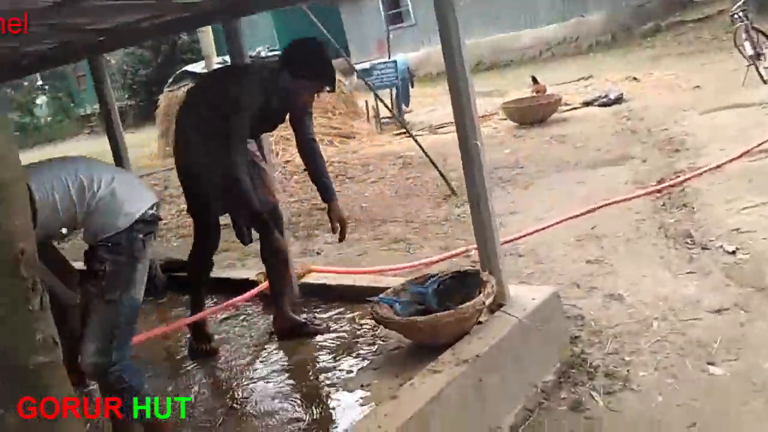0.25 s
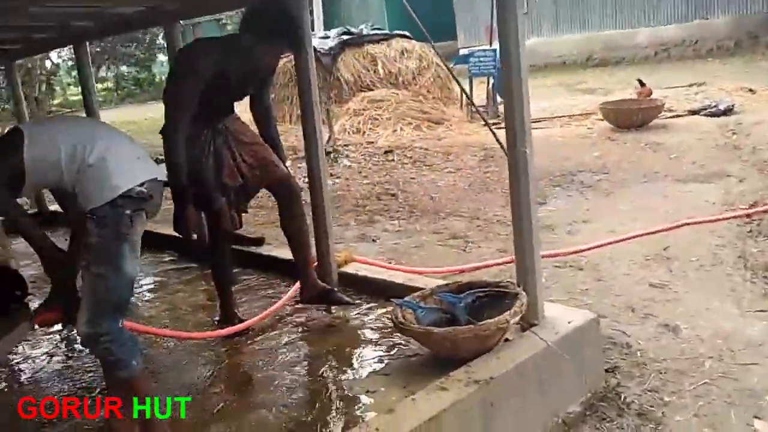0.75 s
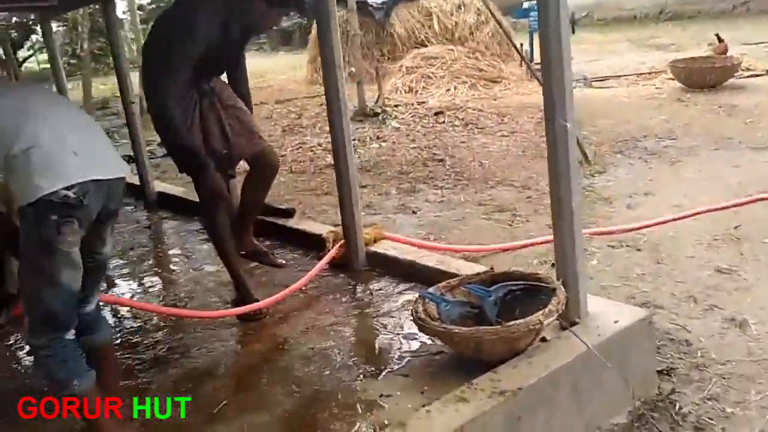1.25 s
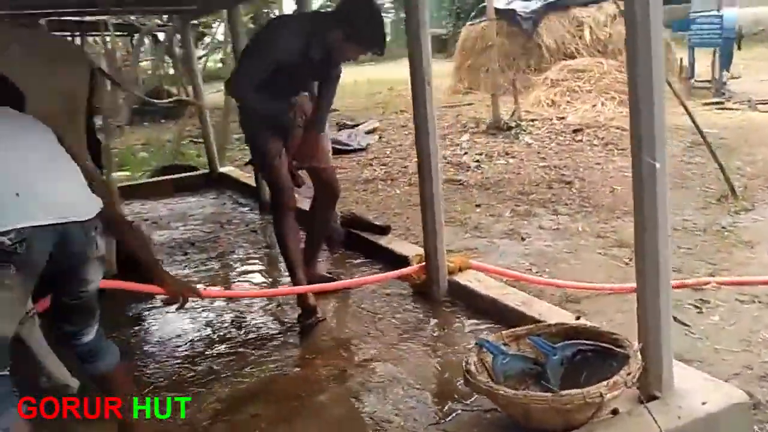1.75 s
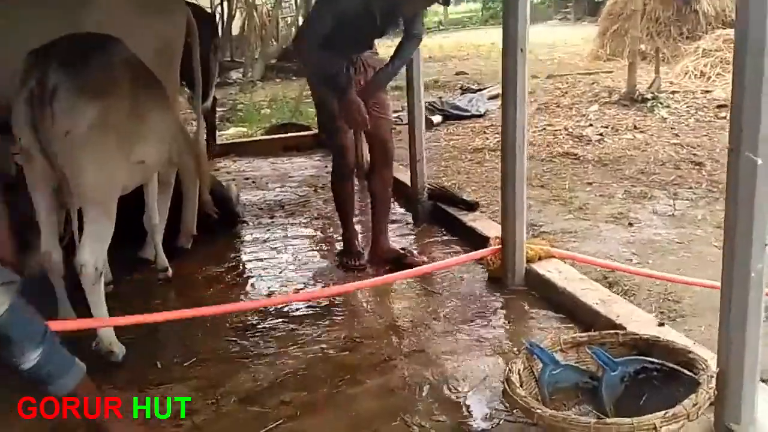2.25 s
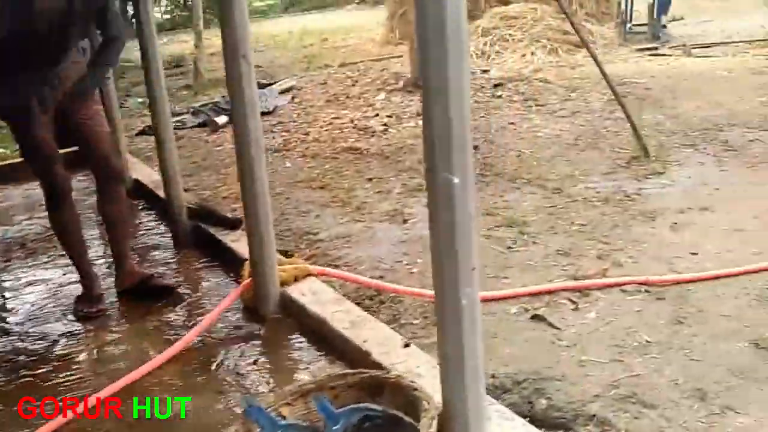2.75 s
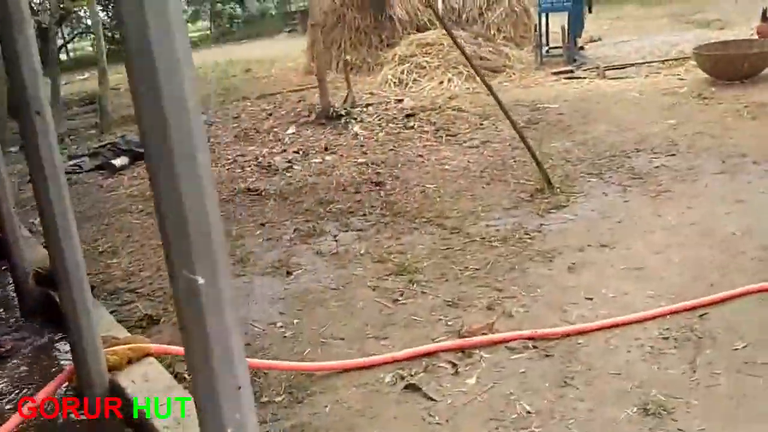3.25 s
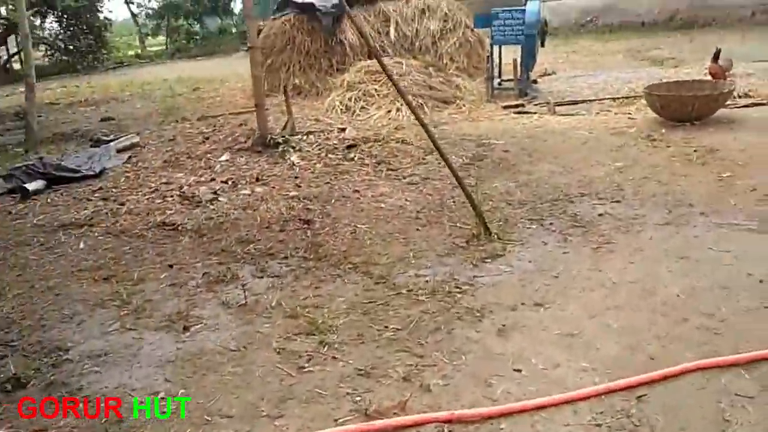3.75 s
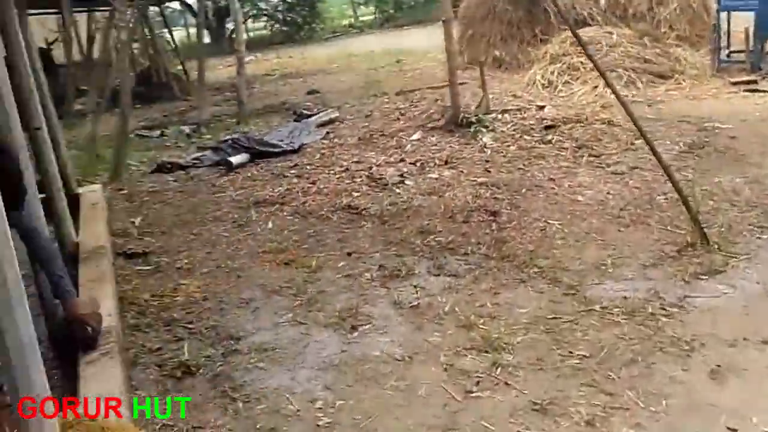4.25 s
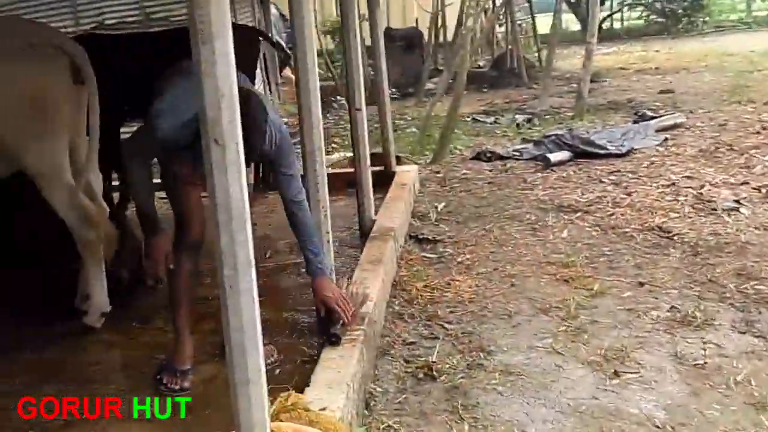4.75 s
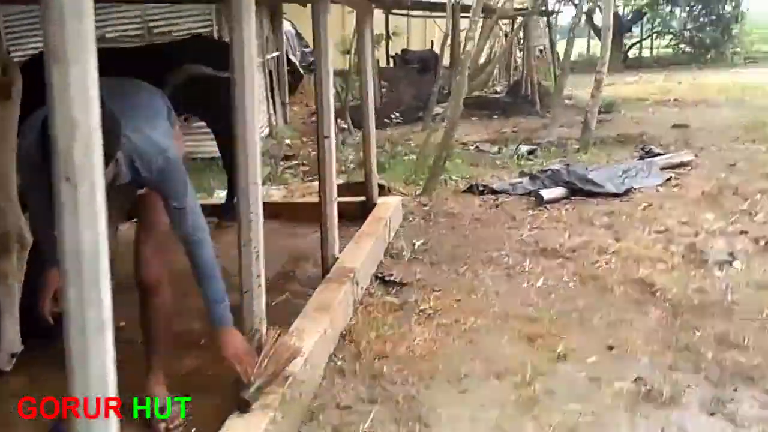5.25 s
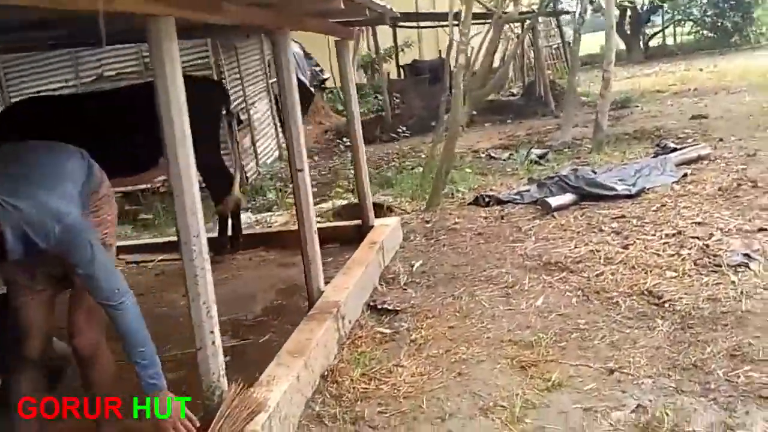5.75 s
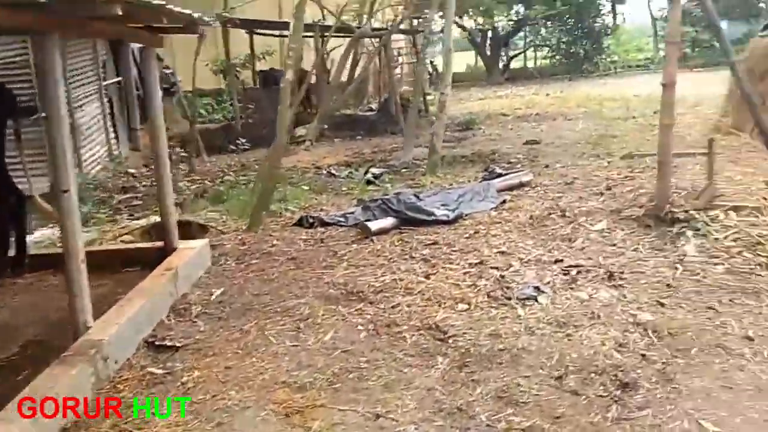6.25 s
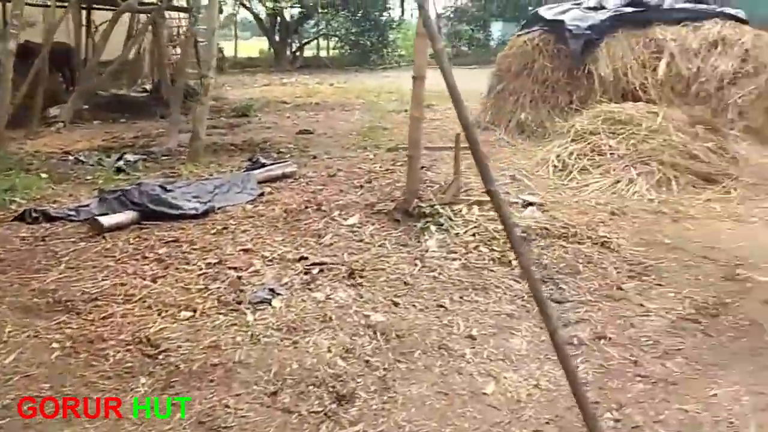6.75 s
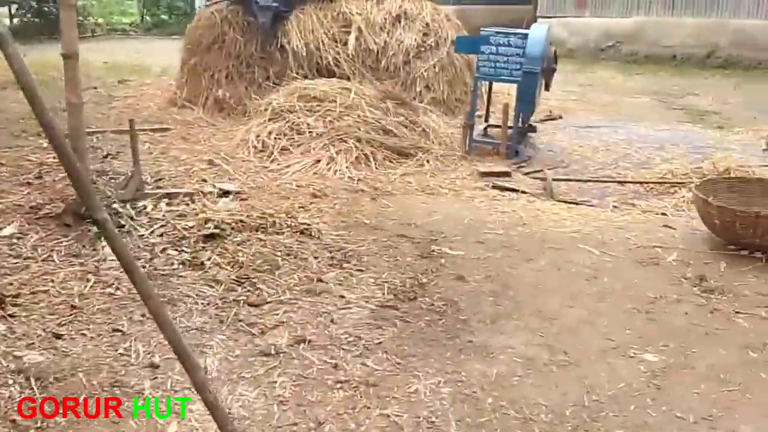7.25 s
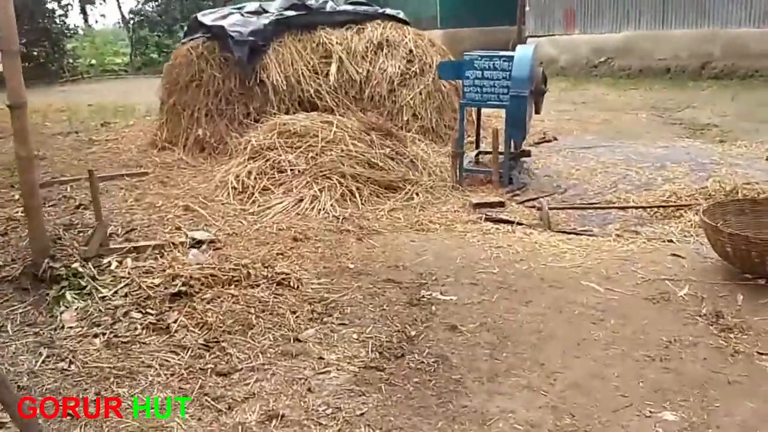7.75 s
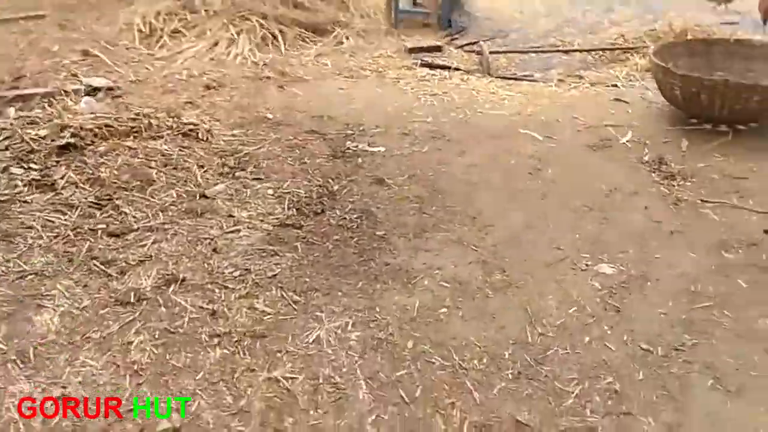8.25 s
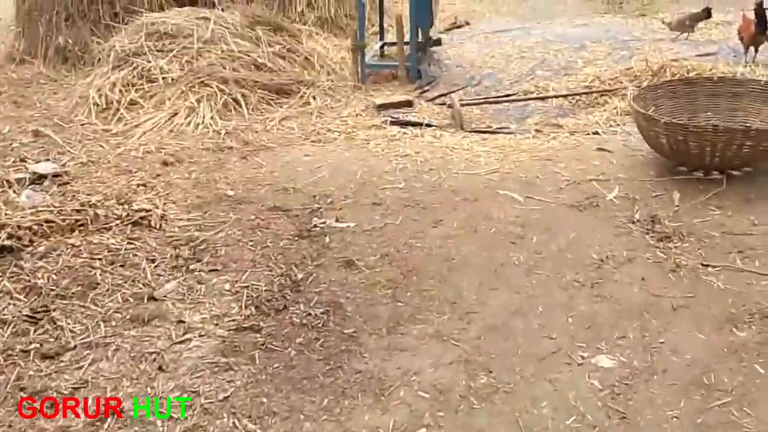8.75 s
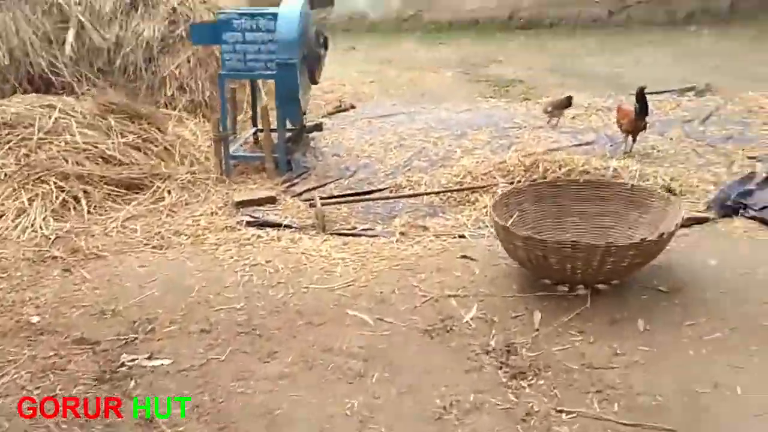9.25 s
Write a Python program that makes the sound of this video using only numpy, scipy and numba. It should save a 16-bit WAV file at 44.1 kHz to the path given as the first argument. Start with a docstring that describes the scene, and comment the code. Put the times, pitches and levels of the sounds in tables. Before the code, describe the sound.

Hose water runs and spatters over wet concrete in an open shed, with sharp slaps, plops, scratchy brush scrubbing and wind thumps.

```python
"""An open cattle shed: hose water runs, spatters and slaps on the wet concrete floor near a hand-held phone.
Crowds of short damped sines over filtered noise make the running water and the slaps; groups of damped sines
that rise in pitch make plops, short thuds and sharp ringing drips. Decaying noise tails give the short echo of
the tin roof. A brush scrubs the kerb as flicks over a rasp, a faint motor hums as a wavering sine, and wind
buffets mostly the left microphone as coloured noise with low thumps."""
import sys
import numpy as np
from scipy import signal
from scipy.fft import rfft, irfft, next_fast_len
from scipy.io import wavfile
from scipy.ndimage import uniform_filter1d, map_coordinates
from numba import njit

SR = 44100
rng = np.random.default_rng(int(sys.argv[2]) if len(sys.argv) > 2 else 0)


def gain_from_decibels(decibels):
    """Convert decibel values to linear amplitude factors."""
    exponent = np.asarray(decibels, float) / 20
    return 10 ** exponent


def generate_wav(sig):
    """Save sig (samples, or channels by samples) to the path in sys.argv[1] as 16-bit PCM at SR."""
    pcm = np.round(np.clip(np.atleast_2d(sig).T, -1, 1) * 32767).astype(np.int16)
    wavfile.write(sys.argv[1], SR, pcm)


N = 418509
TIME = np.arange(N) / SR


def curve(table, column=1):
    """One column of a table as a value per sample."""
    rows = np.array(table)
    return np.interp(TIME, rows[:, 0], rows[:, column])


def unit(x):
    """Scale to rms 1."""
    return x / np.sqrt(np.mean(x ** 2))


def peak_one(x):
    """Scale to peak 1."""
    return x / np.max(np.abs(x))


def shape(points, hz):
    """Gain of (Hz, dB) points joined on a log axis."""
    rows = np.array(points)
    return gain_from_decibels(np.interp(np.log(hz + 1), np.log(rows[:, 0]), rows[:, 1]))


def colour(x, points):
    """Filter by (Hz, dB) points."""
    length = x.shape[-1]
    size = next_fast_len(length)
    gain = shape(points, np.fft.rfftfreq(size, 1 / SR))
    return irfft(rfft(x, size) * gain, size)[..., :length]


def band(x, lo_hz, hi_hz):
    """Band-pass with firm skirts."""
    return signal.sosfilt(signal.butter(3, [lo_hz, hi_hz], "band", fs=SR, output="sos"), x)


def walk(rate):
    """Random levels held 1 / rate s and slewed twice; spread 1."""
    hold = int(SR / rate)
    steps = np.repeat(rng.standard_normal(N // hold + 1), hold)
    slewed = uniform_filter1d(uniform_filter1d(steps, hold), hold)
    return unit(slewed[:N])


def swell(t, length, rise, fall):
    """Gain that rises from t = 0, holds, and dies away after length seconds."""
    return (1 - np.exp(-t.clip(0) / rise)) * np.exp(-(t - length).clip(0) / fall)


@njit
def ring(length, start, hz, cycles, glide, size, lag):
    """Damped sines that swell in over a cycle and rise in pitch; the second port hears each at its own lag."""
    out = np.zeros((2, length + 64))  # 32 spare samples at each end for the lags
    for k in range(len(start)):
        span = int(cycles[k] * SR / hz[k]) + 1  # time constant in samples
        step, rise, fade = 2 * np.pi * hz[k] / SR, glide[k] / span, np.exp(-1 / span)
        phase, a = 0., size[k]
        for i in range(min(4 * span, length - start[k])):
            phase += step * (1 + rise * i)
            a *= fade
            v = a * np.sin(phase) * min(phase / (2 * np.pi), 1.)
            out[0, start[k] + i + 32] += v
            out[1, start[k] + i + 32 + lag[k]] += v
    return out[:, 32:length + 32]


def drops(length, s, hz, chance, spread, cycles, scatter_db, width_ms):
    """Drops at times s, pitches spread about hz, landing over a patch of floor; most are small, a few large."""
    start = (s * SR).astype(np.int64)
    pitch = np.clip(hz * np.exp(spread * chance[:, 0]), 200, 9000)
    size = gain_from_decibels(scatter_db * np.minimum(chance[:, 1] ** 2, 5.5)) * np.sign(chance[:, 2])
    turns = cycles * np.exp(.5 * chance[:, 2])
    lag = np.clip(width_ms * chance[:, 3] * SR / 1000, -30, 30).astype(np.int64)
    return ring(length, start, pitch, turns, np.full(len(s), .03), size, lag)


ROOF_T60_S = .17


def roof(x, size=16384):
    """Tin roof and floor scatter the sound differently to each port; the pattern changes as the phone turns."""
    out, t = np.zeros((2, N + SR)), np.arange(int(.25 * SR)) / SR
    padded, fade = np.pad(x, (size, 2 * size)), np.hanning(2 * size)
    for at in range(0, N + size, size):
        # a fresh tail for each overlapping, faded piece; nothing returns in the first 3 ms
        tail = rng.standard_normal((2, len(t))) * gain_from_decibels(-60 * t / ROOF_T60_S) * (t > .003)
        tail = tail / np.sqrt(np.sum(tail ** 2, axis=1, keepdims=True))
        piece = padded[at:at + 2 * size] * fade
        wet = signal.fftconvolve(piece[None], tail, axes=1)[:, max(size - at, 0):]
        begin = max(at - size, 0)
        out[:, begin:begin + wet.shape[1]] += wet[:, :N + SR - begin]
    return out[:, :N]


# Gusts that thump the left port. Each row: time in seconds, 7 ms ahead of the thump, level in dB, pitch in Hz.
GUST_THUMPS = [(2.443, -40.5, 72.4), (2.554, -33.5, 92), (3.278, -39.5, 58.3), (4.086, -42.5, 87),
               (4.486, -33.5, 99.5), (4.506, -36, 128), (6.291, -43.5, 83), (6.953, -36, 95.4),
               (7.075, -32, 95), (7.103, -29, 165), (7.123, -29, 102), (7.199, -43, 81), (7.282, -37, 103),
               (7.353, -33.5, 122), (9.131, -29.5, 77.2), (9.165, -17.5, 108.7), (9.276, -23, 144),
               (9.348, -31, 137)]


def thumps():
    """Each thump starts sharply 7 ms after its row's time, shoves the membrane and swings back a little."""
    out = np.zeros(N)
    for s, db, hz in GUST_THUMPS:
        at = slice(int(s * SR), int((s + .1) * SR))
        turns = np.clip((TIME[at] - s - .007) * hz, 0, 8)
        envelope = (1 - np.exp(-turns / 0.03)) * np.exp(-(turns / 1.27) ** 1.7)
        out[at] += gain_from_decibels(db) * np.sin(2 * np.pi * turns) * envelope
    return out


# Wind rumble over time. Each row: time in seconds, level in dB before the gain of each port.
WIND_LEVEL = [(0.3, -71), (1.74, -78.5), (2.5, -70.5), (3.22, -58), (3.59, -75), (5.15, -75), (6.0, -72),
              (6.25, -63.5), (6.74, -78.5), (7.15, -57.5), (7.82, -72), (8.85, -49.5), (9.08, -59.5),
              (9.49, -58)]
# Spectrum of the rumble. Each row: frequency in Hz, gain in dB.
RUMBLE_COLOUR = [(20, -42.5), (45, -12.5), (70, -9.5), (120, -9.5), (200, -12), (350, -19), (700, -44)]


def port_rumble():
    """Turbulence at one port: low coloured noise whose level wanders."""
    noise = colour(rng.standard_normal(N), RUMBLE_COLOUR)
    return gain_from_decibels(curve(WIND_LEVEL)) * unit(noise * gain_from_decibels(3.5 * walk(14)))


def wind():
    """Turbulence is mostly separate at each port and much stronger at the left."""
    left = gain_from_decibels(7.0) * port_rumble() + thumps()
    right = gain_from_decibels(-5) * port_rumble() + gain_from_decibels(-24) * left
    return np.array([left, right])


HUM_IDLE_DB, HUM_RISE_S, HUM_FALL_S = -77.5, 0.073, 0.042  # rise and fall are time constants
# Sines in the motor hum. Each row: frequency in Hz, relative level in dB.
MOTOR_LINES = [(183, -6.5)]
# Swells of the hum. Each row: start in seconds, length in seconds, gain in dB added to the idle gain.
MOTOR_SWELLS = [(8.34, 0.61, -51)]


def hum():
    """A motor line that wavers in pitch and throbs in level."""
    wavering_time = np.cumsum(1 + 0.022 * walk(25)) / SR
    lines = np.zeros(N)
    for hz, db in MOTOR_LINES:
        lines += gain_from_decibels(db + 3.5 * walk(35)) * np.sin(2 * np.pi * hz * wavering_time)
    gain = np.full(N, gain_from_decibels(HUM_IDLE_DB))
    for s, length, db in MOTOR_SWELLS:
        gain += gain_from_decibels(db) * swell(TIME - s, length, HUM_RISE_S, HUM_FALL_S)
    return gain * lines


# A brush scrubbing the kerb. Each row: start in seconds, end in seconds,
# level in dB before the swell of the stroke, centre in Hz.
BRUSH_STROKES = [(3.618, 3.656, -49.5, 2500), (3.674, 3.766, -48.5, 2540), (3.766, 3.846, -48.5, 2480),
                 (3.866, 3.924, -53.5, 2170), (4.405, 4.447, -44, 4240), (4.56, 5.062, -54, 5730),
                 (5.053, 5.269, -49, 4200), (5.788, 6.446, -51, 5500), (6.115, 6.635, -51, 2530),
                 (8.842, 8.984, -41, 3230)]


def brush(count=1100):
    """Wet bristles catch and flick free, count times a second, over a rasp; each stroke swells, then eases off."""
    out, chatter = np.zeros((2, N)), gain_from_decibels(1.5 * walk(40) + 2.5 * walk(250))
    for s, end, db, hz in BRUSH_STROKES:
        at, length = slice(int(s * SR), int(end * SR)), end - s
        t, chance = TIME[at] - s, rng.standard_normal((int(count * length), 4))
        when = rng.uniform(0, .98 * length, len(chance))
        flicks = drops(len(t), when, hz, chance, 0.1, 9, 2.3, width_ms=0.08)
        rasp = band(rng.standard_normal((2, len(t))), 0.82 * hz, min(1.93 * hz, 7500))
        stroke = np.abs(np.sin(np.pi * (t / length).clip(0) ** 1.63)) ** 0.23
        out[:, at] += gain_from_decibels(db) * stroke * chatter[at] * unit(unit(flicks) + gain_from_decibels(-3) * unit(rasp))
    return out


# Plops, short thuds and sharp ringing drips; some ring long, some only a few cycles.
# Each row: start in seconds, starting level in dB before the ports, pitch in Hz, ring in cycles;
# the parts of each spread about this pitch and ring for a shorter share of the cycles.
PLOPS_AND_DRIPS = [(0.266, -47, 244, 7.5), (0.425, -39.5, 3900, 24), (0.445, -39.5, 1040, 9),
                   (0.511, -40.5, 966, 11), (0.728, -43, 930, 16.6), (1.255, -45.5, 1220, 25),
                   (1.435, -40.5, 1470, 10.5), (1.618, -25.5, 5280, 10), (1.931, -41.5, 1185, 13.6),
                   (2.451, -40, 805, 20.7), (2.512, -50, 750, 19.5), (2.639, -46, 1133, 19.5),
                   (2.733, -44, 3530, 68), (2.794, -42, 441, 6), (3.08, -33, 1084, 16.3),
                   (3.82, -49, 2150, 32), (4.052, -40, 3590, 66), (4.141, -31, 1124, 17.2),
                   (4.623, -36.5, 990, 18.5), (5.277, -30.5, 2360, 12), (6.801, -27, 4440, 14),
                   (6.846, -25, 2055, 14), (6.898, -32, 2300, 6), (6.841, -39, 482, 6.3),
                   (8.531, -24.5, 926, 4.8), (8.647, -37, 463, 7.6), (9.467, -40.5, 1003, 17)]


def plops(count=5):
    """Each plop, thud or drip is several damped sines close in pitch, one after another and ever smaller."""
    s, db, hz, cycles = np.repeat(PLOPS_AND_DRIPS, count, axis=0).T
    chance = rng.standard_normal((len(s), 2))
    order = np.tile(np.arange(count), len(PLOPS_AND_DRIPS))
    late = (order + 0.27 * chance[:, 0]).clip(0) / count  # 0 = first part to ring
    start = ((s + 1.6 * late * cycles / hz) * SR).astype(np.int64)
    pitch = hz * np.exp(0.04 * chance[:, 1] + 0.16 * late)
    turns = np.maximum(0.4 * cycles, 1)
    return ring(N, start, pitch, turns, np.full(len(s), .05), gain_from_decibels(db - 14 * late), 0 * start)


SLAP_T60_S, SLAP_RISE_S, SLAP_SCATTER_DB = .12, .001, 1.7
SMACK_DB, SMACK_PEAK_S, HEAVY_DB = 3, .001, -16  # smack over drops at HEAVY_DB; time of its envelope's peak
# Slaps of water on the floor. Each row: start in seconds, peak of the drops in dB before the ports,
# centre in Hz, spray relative to the main drops in dB.
WATER_SLAPS = [(0.191, -40, 1920, 6.5), (0.241, -21.5, 1564, -2), (0.2652, -18, 1790, -4.5),
               (0.393, -30.5, 1850, -13.5), (0.515, -34.5, 1800, -19), (0.726, -40, 1130, 34),
               (0.91, -40.5, 1950, -5), (1.16, -32, 3720, 1.5), (1.548, -29.5, 4680, 12.5),
               (1.564, -39.5, 2010, 21), (1.585, -31, 2020, 12), (1.657, -26.5, 2760, 23),
               (1.683, -24, 3900, 2.5), (2.09, -27.5, 3110, 4), (2.206, -35.5, 3450, -22),
               (2.387, -35, 2360, 7), (2.683, -37, 4920, -5), (2.792, -37.5, 800, -15),
               (2.868, -39.5, 1082, -25), (2.932, -34.5, 2990, -35), (3.084, -27, 2630, 24),
               (3.209, -18, 2230, -1), (3.371, -30.5, 2950, 15), (4.139, -28, 1190, 14.5),
               (4.27, -36, 2340, 3), (4.412, -30.5, 2850, 5), (4.559, -48, 5350, -17), (4.62, -36, 1080, 3),
               (5.036, -29.5, 2320, 8), (5.137, -25.5, 3780, -11), (5.282, -35, 2130, -20),
               (5.422, -36.5, 5500, 8), (5.471, -34.5, 2270, 0.5), (5.59, -29.5, 2020, 4.5),
               (5.644, -36, 4300, -5), (5.695, -46, 4530, 0), (5.841, -35, 2050, -16),
               (5.871, -35.5, 923, -15), (5.981, -42, 2700, -4), (6.801, -36, 4290, 4),
               (6.836, -31.5, 1820, 2), (7.085, -34.5, 2070, -2), (7.462, -38, 3010, -14),
               (7.555, -31.5, 2280, -50), (7.716, -32.5, 2340, -3), (7.939, -30, 2210, -14),
               (8.045, -41, 860, -30), (8.196, -33, 2050, -4), (8.578, -23.5, 2356, -19),
               (8.616, -28.5, 2540, 6), (8.955, -24, 3290, -14.5), (9.006, -21, 1547, -7.5)]


def slaps(count=30):
    """A sheet of water smacks down, then lands as a ragged crowd of drops, packed at the front, that thins and fades."""
    out, length = np.zeros((2, N + SR)), SR // 8
    t = np.arange(length) / SR
    fade = gain_from_decibels(-60 * t / SLAP_T60_S) * (1 - np.exp(-t / SLAP_RISE_S))
    for s, db, hz, spray_db in WATER_SLAPS:
        burst, light_db = 0, 0.4 * (db - HEAVY_DB)  # lighter sheets smack and thud less
        # main drops, spray, thud
        for centre_hz, share_db, cycles in ((hz, 0, 4.5), (5000, spray_db, 8.5), (0.44 * hz, -10 + light_db, 2.6)):
            # one drop in each slot of a ladder whose rungs widen
            ladder = (np.arange(count) + rng.uniform(0, 1, count)) / count
            when, chance = .4 * SLAP_T60_S * ladder ** 1.5, rng.standard_normal((count, 4))
            crowd = drops(length, when, centre_hz, chance, 0.2334, cycles, SLAP_SCATTER_DB, width_ms=0.097)
            burst = burst + gain_from_decibels(share_db) * peak_one(crowd * fade)
        contact = rng.standard_normal(length) * t * np.exp(-t / SMACK_PEAK_S)
        smack = band(contact, 0.7 * hz, min(1.4 * hz, 7500))
        burst = peak_one(burst) + gain_from_decibels(SMACK_DB + light_db) * peak_one(smack)
        out[:, int(s * SR):int(s * SR) + length] += gain_from_decibels(db) * burst
    return out[:, :N]


def stream(lo_hz, hi_hz, count, cycles, scatter_db, hiss_db, surge, lift=1, spread=0.19):
    """Drops too dense to count over a diffuse hiss; their pitch drifts in patches and both surge with the flow."""
    when, chance = rng.uniform(0, N / SR, count), rng.standard_normal((count, 4))
    drift = lift * np.exp(0.1005 * walk(16))
    centre_hz = np.sqrt(lo_hz * hi_hz) * drift[(when * SR).astype(int)]
    grains = drops(N, when, centre_hz, chance, spread, cycles, scatter_db, width_ms=0.06)
    hiss = band(rng.standard_normal((2, N)), lo_hz, hi_hz)
    mixed = unit(grains) + gain_from_decibels(hiss_db) * unit(hiss)
    return unit(mixed * gain_from_decibels(surge + 1.3 * walk(45)))


# Level between gushes in dB before the ports: patter, spray, slosh.
TRICKLE_LEVELS = (-72.5, -75.5, -75.5)
GUSH_RISE_S, DRAIN_S = 0.032, (0.058, 0.11, 0.061)  # time constants; drains of patter, spray, slosh
# Gushes from the hose. Each row: start in seconds, length in seconds, then the gains in dB, added to the
# trickle before the ports, of the patter of drops, the fine spray and the slosh of the puddle.
HOSE_GUSHES = [(0.172, 0.24, -56.5, -58.5, -55), (0.492, 0.13, -54, -49, -56),
               (0.695, 0.22, -58.5, -48.5, -70), (1.099, 0.33, -58, -46, -84),
               (1.558, 0.15, -59.5, -54.5, -99), (2.055, 0.44, -63.5, -63, -105),
               (2.59, 0.37, -60, -63.5, -69.5), (3, 0.26, -49, -44, -59), (3.343, 0.2, -59, -73, -76),
               (3.637, 0.28, -61.5, -59, -83), (4.125, 0.39, -60.5, -49.5, -78.5),
               (4.995, 0.29, -52, -48, -82), (5.392, 0.41, -64, -55.5, -82), (5.788, 0.19, -50, -58, -70),
               (6.205, 0.46, -54, -53, -60), (6.76, 0.31, -51.5, -51.5, -64.5),
               (7.048, 0.54, -59, -70, -59.5), (7.514, 0.59, -56.5, -64.5, -60),
               (8.18, 0.43, -51, -53.5, -69), (8.473, 0.6, -51.5, -56, -53.5),
               (9.076, 0.95, -60.5, -82, -66)]
# Pitch of the slosh drops, lower where the puddle is deep. Each row: time in seconds, factor on their centre pitch.
PUDDLE_PITCH = [(0.9, 1.08), (6.3, 0.66), (7.4, 0.95)]


def flow():
    """Each gush lifts patter, spray and slosh over the trickle, then drains; they share the quick surges of the jet."""
    surge = walk(22)  # dB
    patter = stream(1562, 3500, count=9000, cycles=8, scatter_db=2.1, hiss_db=-6, surge=surge)
    spray = stream(3620, 7200, count=16000, cycles=13, scatter_db=2.2, hiss_db=-7, surge=surge)
    slosh = stream(500, 1782, count=6000, cycles=5.6, scatter_db=1.7, hiss_db=-1.5,
                   surge=1.4 * surge, lift=curve(PUDDLE_PITCH), spread=0.3)
    out = 0
    for k, layer in enumerate((patter, spray, slosh)):
        gain = np.full(N, gain_from_decibels(TRICKLE_LEVELS[k]))
        for s, length, *db in HOSE_GUSHES:
            at = slice(int(s * SR), int((s + length + 8 * DRAIN_S[k]) * SR))
            gain[at] += gain_from_decibels(db[k]) * swell(TIME[at] - s, length, GUSH_RISE_S, DRAIN_S[k])
        out = out + gain * layer
    return out


ROOF_DB = -8
# Where the water is heard from. Each row: time in seconds, lag of left behind right in ms, gain of the left port in dB.
WATER_BEARING = [(0, 0.092, 4), (0.42, 0.044, 6), (0.52, 0.17, 7), (2.2, 0.19, 3), (3, 0.375, 2.5),
                 (5, 0.34, 3.5), (9.49, 0.28, -0.5)]
# Response of the right port. Each row: frequency in Hz, gain in dB, before a flat lift.
RIGHT_RESPONSE = [(60, -3), (320, 3.5), (700, -10), (1500, -8), (3000, -10.5), (5300, -9), (8000, 1.5)]


def scene():
    """Two ports hear the sources and their echo; the left hears them direct a fraction of a millisecond late."""
    sources = hum() + brush() + plops() + slaps() + flow()
    late = map_coordinates(sources[0], [np.arange(N) - curve(WATER_BEARING) * SR / 1000], order=3)
    left, right = np.array([late, sources[1]]) + gain_from_decibels(ROOF_DB) * roof(sources[1])
    left = gain_from_decibels(curve(WATER_BEARING, column=2)) * left
    right = gain_from_decibels(4.5) * colour(right, RIGHT_RESPONSE)
    return np.array([left, right]) + wind()


HALF_RATE_HZ = 8000
# Response of the phone's microphones. Each row: frequency in Hz, gain in dB.
MIC_RESPONSE = [(20, -26.5), (60, 3.5), (5000, 2), (6300, -1), (7500, -10.5), (7950, -21.5)]
# Gain of the mirrored treble. Each row: frequency in Hz, gain in dB.
MIRROR_RESPONSE = [(8000, -27), (8600, -2), (9200, -7.5), (9950, -58.5)]


def phone(dry):
    """The phone samples at a low rate: the top is cut and a weak mirror of it shows above half that rate."""
    heard = colour(dry, MIC_RESPONSE)
    mirror = heard * np.cos(4 * np.pi * HALF_RATE_HZ * TIME)
    above = colour(mirror, [(20, -120), (HALF_RATE_HZ, -120), *MIRROR_RESPONSE, (10100, -120)])
    return heard + above


def top_cut(x):
    """Nothing passes above the cut-off."""
    return signal.sosfilt(signal.butter(12, 9950, fs=SR, output="sos"), x)


def record(dry):
    """The hand-held phone takes in the whole scene."""
    mix = phone(dry)
    return top_cut(mix)


dry = scene()
out = record(dry)
generate_wav(out)
```